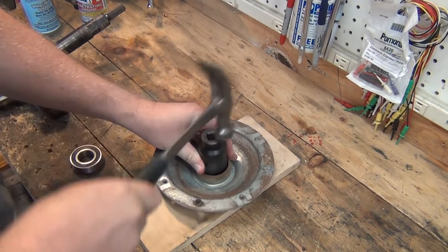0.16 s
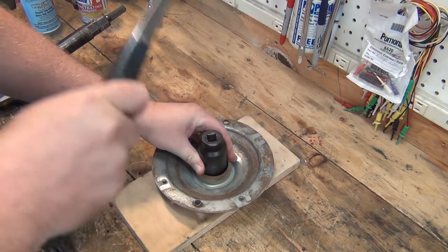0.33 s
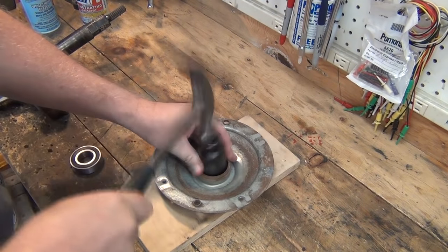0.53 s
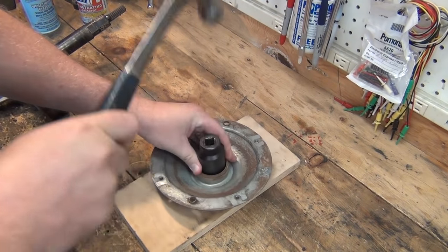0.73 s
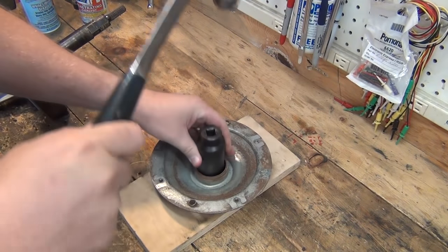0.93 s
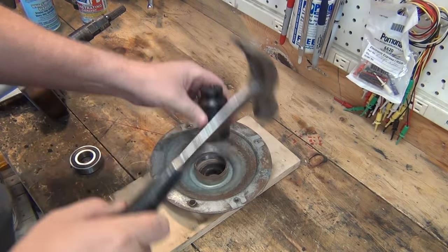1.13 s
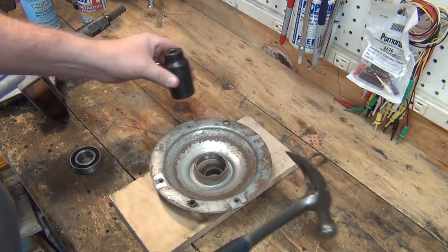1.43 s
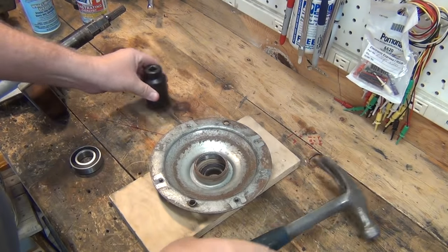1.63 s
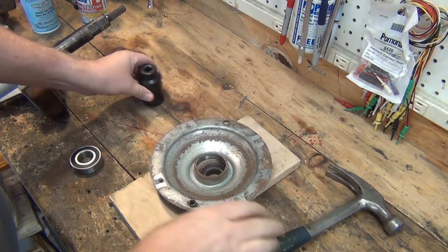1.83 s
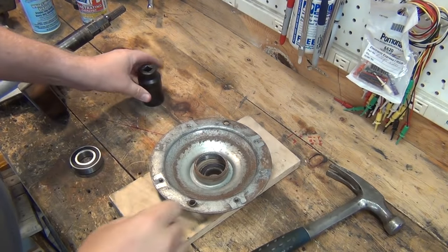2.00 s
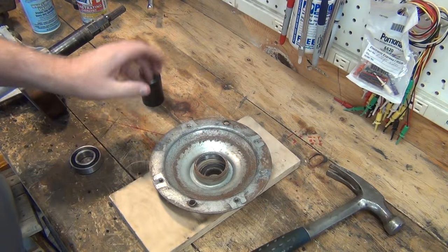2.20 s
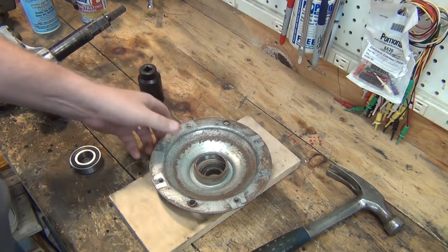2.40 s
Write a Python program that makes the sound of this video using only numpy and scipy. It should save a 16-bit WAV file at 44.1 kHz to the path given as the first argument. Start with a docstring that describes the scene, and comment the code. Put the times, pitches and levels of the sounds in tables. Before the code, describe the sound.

Two hard hammer blows on a steel socket crack and ring over an earlier blow's fading ring; the lifted socket scrapes and clinks faintly, then socket and hammer knock onto a wooden bench, close microphone overloading.

```python
"""A hammer head is already singing from a blow just before the start; two more blows on a steel socket drive
a bearing out of its housing, the last freeing it. Each is decaying noise plus damped modes of the steel parts.
Between blows the arm's air gusts are low noise; then the lifted socket scrapes and clinks as brief modes.
Socket, then hammer, are put down on a wooden bench: decaying noise, damped bench modes and a faint steel ring.
Room tone, rubbing hands and a thin hiss are shaped noise; the loud blows overload the close microphone."""
import sys
import numpy as np
from scipy import signal
from scipy.io import wavfile
from scipy.ndimage import uniform_filter1d

SR = 44100
rng = np.random.default_rng(int(sys.argv[2]) if len(sys.argv) > 2 else 0)


def bounce(signal):
    """Save signal as a 16-bit WAV file at the path given by the first command-line argument."""
    frames = np.transpose(np.atleast_2d(signal))
    limited = np.clip(frames, -1, 1)
    pcm = np.round(limited * 32767).astype(np.int16)
    wavfile.write(sys.argv[1], SR, pcm)


N = 112454

LEAD_S = 0.4  # synthesized ahead of time zero, so that earlier ringing carries over
LENGTH = N + round(LEAD_S * SR)
AGE = np.arange(LENGTH) / SR  # seconds since a sound began
TIME = AGE - LEAD_S  # seconds on the scene's clock

# contact noise with the bearing seated: (frequency [Hz], relative density [dB per Hz])
CRACK_SEATED = [(53, -35), (90, -1.5), (236, -16.5), (473, -6), (683, -6), (741, -4.5), (821, -9),
                (2020, -7), (3590, -5), (6360, -14), (9200, -9), (12000, -20), (15600, -60.5),
                (22000, -120)]
# the hammer lands, bounces and tips over:
# (time [s], relative level [dB], brightness [dB per octave], noise t60 [s])
HAMMER_DOWN = [(1.826, -7, -2.5, 0.011), (1.8306, -4.5, 1.5, .011), (1.835, -5.5, .5, 0.017),
               (1.839, -12.5, 0.5, 0.023), (1.8743, -16.5, -1.5, 0.049), (1.877, -16.5, 1, 0.039),
               (1.9617, -19, -2.5, 0.09)]


def amp(db):
    """Logarithmic level: 20 dB is a factor of ten in amplitude."""
    return 10 ** (np.asarray(db) / 20)


def read(points, hz):
    """Logarithmic pitch: values are interpolated on a log-frequency axis."""
    f, value = np.transpose(points)
    return np.interp(np.log(hz + 1), np.log(f + 1), value)


def add(mix, s, sound):
    """Superposition: a sound is added in place from time s onward."""
    start = max(round((s + LEAD_S) * SR), 0)
    part = mix[start:][:len(sound)]
    part += sound[:len(part)]


def colour(x, spectrum, tilt_db=0):
    """Minimum-phase filtering: log gain fixes the phase; unit-energy taps, tilted in dB per octave."""
    hz = abs(np.fft.fftfreq(4096, 1 / SR))
    tilt = tilt_db * np.log2(np.maximum(hz, 150))
    log_gain = np.log(amp(read(spectrum, hz) + tilt))
    response = np.exp(np.conj(signal.hilbert(log_gain)))
    taps = np.fft.ifft(response).real[:2048]
    return signal.fftconvolve(x, taps / np.linalg.norm(taps))[:len(x)]


def noise(spectrum):
    """Stationary random process: white noise shaped to a power spectrum."""
    return colour(rng.standard_normal(LENGTH), spectrum)


def burst(spectrum, t60, tilt_db=0):
    """High modal density: a contact's many close resonances merge into exponentially decaying noise."""
    decay = amp(-60 * np.minimum(AGE / t60, 5))
    return colour(rng.choice([-1., 1.], LENGTH) * decay, spectrum, tilt_db)


def ring(modes, width_hz=0):
    """Modal decay: damped sines from (Hz, initial rms dB, t60 s); phase diffusion blurs each over width_hz."""
    out = np.zeros(LENGTH)
    for hz, db, t60 in modes:
        t = AGE[:round(min(1.5 * t60 * SR, LENGTH))]
        # a random walk of the phase, stepped every 64 samples
        steps = rng.standard_normal(LENGTH // 64 + 1) * np.sqrt(2 * np.pi * abs(width_hz) * 64 / SR)
        step_times = AGE[::64]
        walk = (np.cumsum(steps) - steps[0])[:len(step_times)]
        blur = np.interp(t, step_times, walk)
        envelope = np.sqrt(2) * amp(db - 60 * t / t60)
        out[:len(t)] += envelope * np.sin(2 * np.pi * hz * t + blur)
    return out


def struck(pitches, modes, free, width_hz=0):
    """Boundary conditions: a seated or freed bearing changes how strongly each mode is excited."""
    rows = [(hz, loose if free else seated, t60)
            for hz, (seated, loose, t60) in zip(pitches, modes)]
    return ring(rows, width_hz)


def room(x):
    """Diffuse reverberation: dense reflections build up quickly and decay at a rate set by frequency."""
    # workshop reverberation: (frequency [Hz], t60 [s])
    room_decay = [(100, 0.38), (300, 0.69), (800, 0.57), (2000, 0.51), (4000, 0.58), (8000, 0.39),
                  (12000, 0.28)]
    build_s = 0.0067
    hz, t, z = signal.stft(rng.standard_normal(SR), SR, nperseg=256)
    decay = amp(-60 * t / read(room_decay, hz)[:, None])
    tail = signal.istft(z * decay, SR, nperseg=256)[1][:SR]
    tail = tail * (1 - np.exp(-(AGE[:SR] / build_s) ** 2))
    return signal.fftconvolve(x, tail / np.linalg.norm(tail))[:LENGTH]


def swells(rows):
    """Incoherent summation: Gaussian bumps of (s, dB, half length s at 1/e power) add as powers."""
    return np.sqrt(sum(amp(db) ** 2 * np.exp(-((TIME - s) / half) ** 2) for s, db, half in rows))


def crack_of(free):
    """Frequency-dependent damping: the steel's treble dies sooner than the thump of the bench."""
    # contact noise as the bearing breaks free: (frequency [Hz], relative density [dB per Hz])
    crack_free = [(53, -50.5), (90, -22), (200, -15), (334, -16.5), (642, -8.5), (1240, -15.5),
                  (2980, -9.5), (4880, -19.5), (5290, -9), (6760, -27), (9980, -16.5), (12000, -30),
                  (15600, -72), (22000, -120)]
    split_hz, thump_db = 1700, -0.5
    thump_t60_s, treble_t60_s = 0.097, 0.052
    spectrum = crack_free if free else CRACK_SEATED
    low = signal.butter(2, split_hz, "low", fs=SR)
    high = signal.butter(2, split_hz, "high", fs=SR)
    thump = signal.lfilter(*low, burst(spectrum, thump_t60_s))
    treble = signal.lfilter(*high, burst(spectrum, treble_t60_s))
    return amp(thump_db) * thump + treble


def hammering():
    """Impact excitation: blows crack and ring socket and housing; the head sings until its next contact."""
    # hammer blows: (time [s], relative force [dB], bearing [0 seated, 1 breaking free])
    blows = [(-.205, -1, 0), (0.2026, -1.5, 0), (.6113, -3, 1)]
    # the socket chatters in its seat after a blow: (time [s], relative level [dB])
    chatter = [(0.2784, -15), (.338, -17.5), (0.77, -40)]
    # mode pitches of hammer head, socket with bearing, and housing on its wooden block: (frequency [Hz])
    head_hz = [805, 1957, 2720, 2744, 3137, 3247, 3278, 3779, 3817, 4054, 4387, 4425, 5110, 5911, 6178,
               7500]
    socket_hz = [2484, 2600, 2782, 2897, 3090, 3650, 4365, 5235, 5352, 7112, 8052, 8218, 8985, 9705, 9825]
    housing_hz = [88, 140, 224, 356, 482, 630, 662, 916, 1140, 1355, 1500]
    # their modes in the same order: (relative level seated [dB], breaking free [dB], t60 [s])
    head_modes = [(-56, -58.5, 2.7), (-52.5, -55, 2.9), (-48, -44.5, 2.2), (-47.5, -52, 5.8),
                  (-45, -50, 1.7), (-46.5, -46, 2.7), (-58.5, -47, 2.8), (-61, -49.5, 7.1), (-37, -46, 2.4),
                  (-54.5, -59.5, 0.79), (-49, -66, 4.5), (-49, -52, 1.5), (-47.5, -59.5, 1.7),
                  (-56.5, -59.5, 2.4), (-59.5, -57.5, 1.6), (-52, -64, 0.95)]
    socket_modes = [(-34, -10, 0.096), (-24, -18, 0.18), (-28.5, -30.5, 0.55), (-29.5, -21.5, 0.6),
                    (-22.5, -23, .17), (-4, -12.5, 0.09), (-38.5, -22, 0.24), (-34.5, -21.5, 0.23),
                    (-29.5, -37.5, 0.51), (-25, -36, 0.29), (-36, -21, 0.11), (-38.5, -18.5, 0.13),
                    (-31.5, -39, 0.23), (-34.5, -20.5, 0.19), (-24.5, -27, 0.26)]
    housing_modes = [(-36.5, -39.5, .4), (-31.5, -38, .3), (-29, -39.5, 0.3), (-33, -47.5, 0.38),
                     (-20, -29, 0.22), (-27, -21.5, 0.36), (-36, -27, 0.57), (-31.5, -27, 0.52),
                     (-37, -33, 0.32), (-34, -26, 0.46), (-32, -32, 0.57)]
    crack_db, crack_wet_db, ring_wet_db = -1.5, -6.5, -15.5
    grip_width_hz = 14
    stop_s, chatter_s = 0.004, 0.009  # extra 1/e decay times

    crack, parts, head = np.zeros((3, LENGTH))
    stops = [row[0] for row in blows[1:]] + [HAMMER_DOWN[0][0]]
    for (s, db, free), stop in zip(blows, stops):
        add(crack, s, amp(db + crack_db) * crack_of(free))
        socket = struck(socket_hz, socket_modes, free, grip_width_hz)
        housing = struck(housing_hz, housing_modes, free, grip_width_hz)
        add(parts, s, amp(db) * (socket + housing))
        damping = np.exp(-np.maximum(AGE + s - stop, 0) / stop_s)
        add(head, s, amp(db) * struck(head_hz, head_modes, free) * damping)
    for s, db in chatter:
        rattle = amp(-7.5) * burst(CRACK_SEATED, t60=0.051, tilt_db=-4.5)
        socket = struck(socket_hz, socket_modes, 0, width_hz=84) * np.exp(-AGE / chatter_s)
        add(parts, s, amp(db) * (socket + rattle))
    reflected = room(amp(crack_wet_db) * crack + amp(ring_wet_db) * parts)
    return crack + parts + head + reflected


def background():
    """Broadband random sources: arm-driven air, rubbing hands, hiss and room tone are shaped noise."""
    # air from the swinging arm on the microphone:
    # (time [s], relative level [dB], half length at 1/e power [s])
    puffs = [(0, -38, 0.057), (.328, -18, 0.02), (.36, -34.5, 0.11), (.79, -27, 0.014),
             (.858, -29.5, 0.011), (.88, -40, 0.093)]
    # hands shifting on the bench: (time [s], level [dB], half length at 1/e power [s])
    rubs = [(1.41, -60.5, 0.03), (1.58, -63.5, 0.21), (2.405, -62.5, .025)]
    # spectra of air, hands, thin hiss and room tone: (frequency [Hz], relative density [dB per Hz])
    air_spectrum = [(10, -8), (25, -3), (52, 3), (75, -11.5), (120, -19.5), (220, -41), (600, -71)]
    rub_spectrum = [(40, -6.5), (150, 2), (400, -5), (1000, -24), (4000, -19), (12000, -61)]
    hiss_spectrum = [(2000, -5.5), (6000, -11), (9000, -9), (11500, -3.5)]
    floor_spectrum = [(12, -26), (20, 1), (283, -26), (434, -29.5), (632, -30), (969, -35), (3410, -44.5),
                      (3700, -38), (4460, -56), (4960, -47.5), (12000, -52.5), (15600, -81), (22000, -120)]
    # the hiss comes and goes: (time [s], level [dB])
    hiss_level = [(1, -80), (1.3, -65), (1.6, -68.5), (1.8, -66.5), (2.4, -80.5)]
    floor_db = -55.5

    air = noise(air_spectrum)
    # dividing by the smoothed envelope evens out the random fluctuation
    power = uniform_filter1d(abs(signal.hilbert(air)) ** 2 / 2, size=900)
    air = air / np.sqrt(power + 0.071)
    hiss = noise(hiss_spectrum) * amp(np.interp(TIME, *np.transpose(hiss_level)))
    hands = noise(rub_spectrum) * swells(rubs)
    return air * swells(puffs) + hands + hiss + amp(floor_db) * noise(floor_spectrum)


def clinks():
    """Free vibration and friction: the lifted socket touches the housing, rings and slides along the rim."""
    # touches on the way out: (time [s], relative level [dB], brightness [dB per octave])
    touches = [(.912, -45, -28), (1.016, -61.5, 10.5), (1.046, -45.5, 6)]
    # slides along the rim: (time [s], relative level [dB], half length at 1/e power [s])
    slides = [(.925, -52, 0.019), (.98, -50, 0.032), (1.045, -45.5, .016)]
    # the socket ringing freely: (frequency [Hz], relative level [dB], t60 [s])
    free_modes = [(2473, 2.5, 0.14), (2530, -13.5, 0.6), (2800, -24, .4), (3588, 1.5, 0.69),
                  (3600, -17, .4), (6100, -19, 0.28), (9150, -30, .3), (9663, -26, 0.23)]
    # scrape noise: (frequency [Hz], relative density [dB per Hz])
    scrape = [(1500, -20), (2100, -25), (2450, 10), (3000, -4.5), (4200, -20), (5500, -10), (7200, -26),
              (9300, -19.5), (11000, -34)]
    scrape_db, scrape_t60_s, wet_db = -16, 0.12, -7

    out = noise(scrape) * swells(slides)
    for s, db, tilt in touches:
        # brightness tilts the mode levels about 3 kHz
        modes = [(hz, level + tilt * np.log2(hz / 3000), t60) for hz, level, t60 in free_modes]
        contact = amp(scrape_db) * burst(scrape, scrape_t60_s)
        add(out, s, amp(db) * (ring(modes) + contact))
    return out + amp(wet_db) * room(out)


def putting_down():
    """Damped impact: wood takes the landing tools with dull knocks, and steel keeps a faint ring."""
    # the socket is stood on the bench:
    # (time [s], relative level [dB], brightness [dB per octave], t60 [s])
    socket_down = [(1.6718, -38.5, 1, 0.048), (1.679, -25, -7.5, 0.033)]
    # bench noise under socket and hammer: (frequency [Hz], relative density [dB per Hz])
    thud = [(60, -11), (170, -8), (330, -3), (600, -3), (900, -12), (1400, -19), (1900, -16.5),
            (3000, -26.5), (6000, -45.5), (12000, -54.5)]
    wood_spectrum = [(50, -40), (90, -8.5), (170, -4.5), (320, -2), (520, 1.5), (700, 4), (950, 1),
                     (1350, -2), (1750, -6.5), (2300, -16), (3500, -18), (4800, -34), (6200, -40.5),
                     (11000, -39)]
    # the bench top under the hammer: (frequency [Hz], relative level [dB], t60 [s])
    bench = [(680, -13, .05), (925, -3, .04), (1110, 3, .018), (1330, -6, .03), (1680, -10, .035)]
    # faint ring of the tools after they land: (frequency [Hz], level [dB], t60 [s])
    landed = [(3060, -67.5, 1.94), (3460, -66.5, 2.4), (3640, -64, 1.5), (5130, -79, 4.3), (6170, -72.5, 3),
              (7460, -66, 1.3)]
    bench_db, bench_rise_s, wet_db = -7.5, 0.00068, -6.5

    wood, steel = np.zeros((2, LENGTH))
    for s, db, tilt, t60 in socket_down:
        add(wood, s, amp(db) * burst(thud, t60, tilt))
    for s, db, tilt, t60 in HAMMER_DOWN:
        rise = 1 - np.exp(-(AGE / bench_rise_s) ** 2)
        knock = amp(bench_db) * ring(bench, width_hz=25) * rise
        add(wood, s, amp(db) * (knock + amp(-3) * burst(wood_spectrum, t60, tilt)))
    add(steel, HAMMER_DOWN[0][0], ring(landed))
    return wood + steel + amp(wet_db) * room(wood)


def scene():
    """Linear superposition: all sources sum at one microphone, which feeds both channels."""
    mono = hammering() + clinks() + putting_down() + background()
    mono = mono[-N:]  # drops the lead
    return np.array([mono, mono])


def record(dry):
    """Saturation and band limiting: the input overloads on loud sounds, then a low-pass removes the top."""
    overload, edge_hz = 0.38, 12150  # amplitude ceiling, low-pass edge
    clipped = dry / (1 + (dry / overload) ** 8) ** (1 / 8)
    lowpass = signal.firwin(301, edge_hz, window=("kaiser", 9), fs=SR)
    return signal.oaconvolve(clipped, lowpass[None], "same")


dry = scene()
out = record(dry)
bounce(out)
```